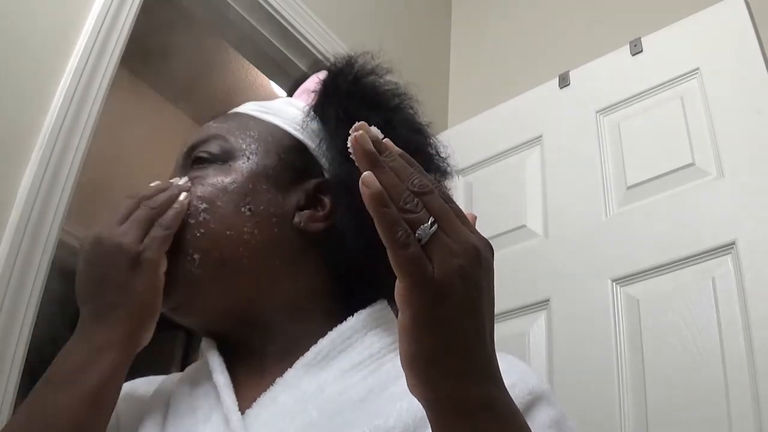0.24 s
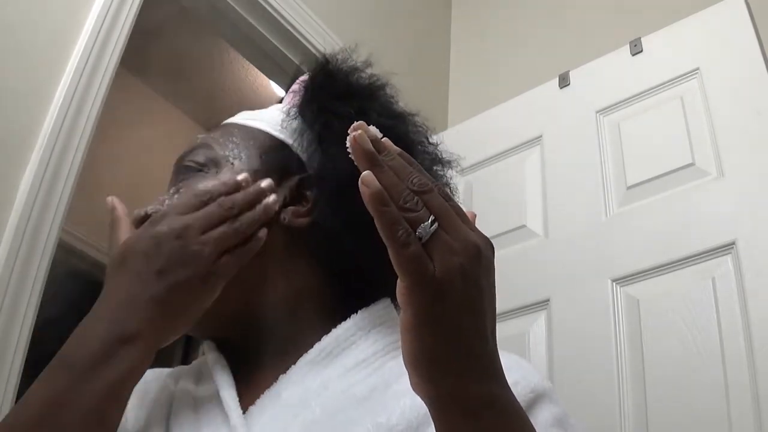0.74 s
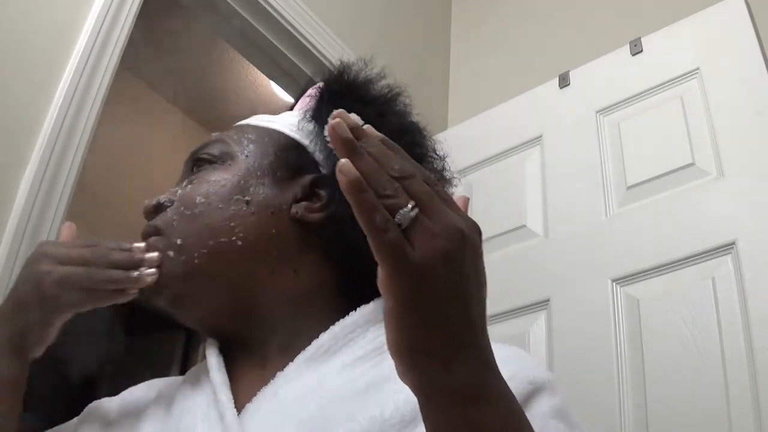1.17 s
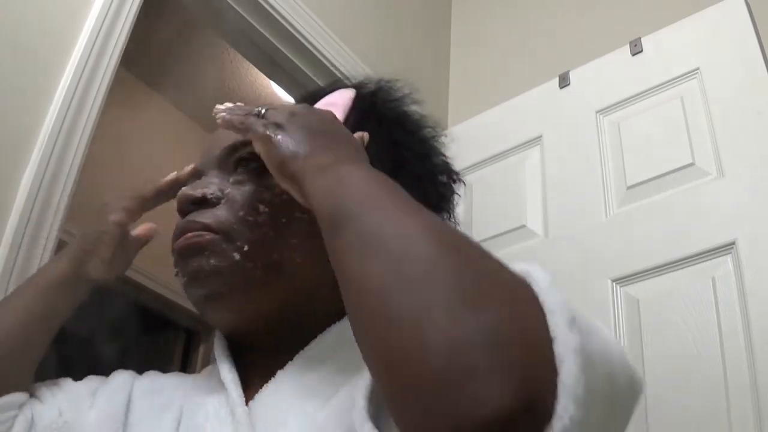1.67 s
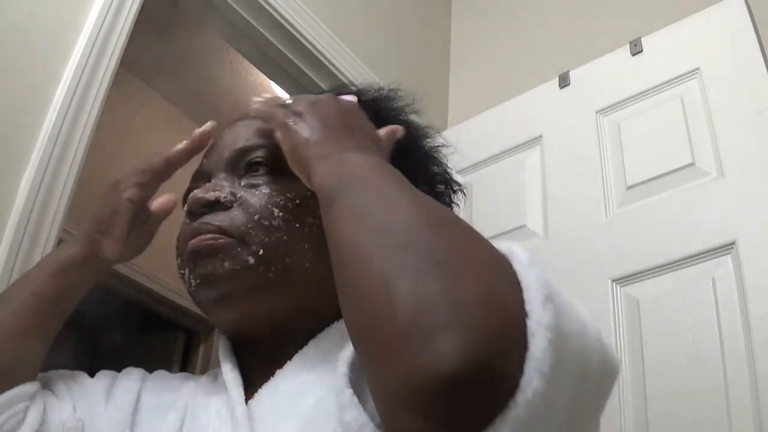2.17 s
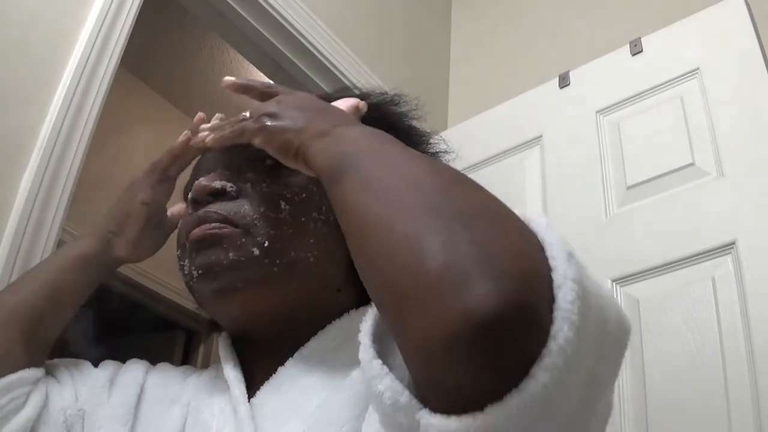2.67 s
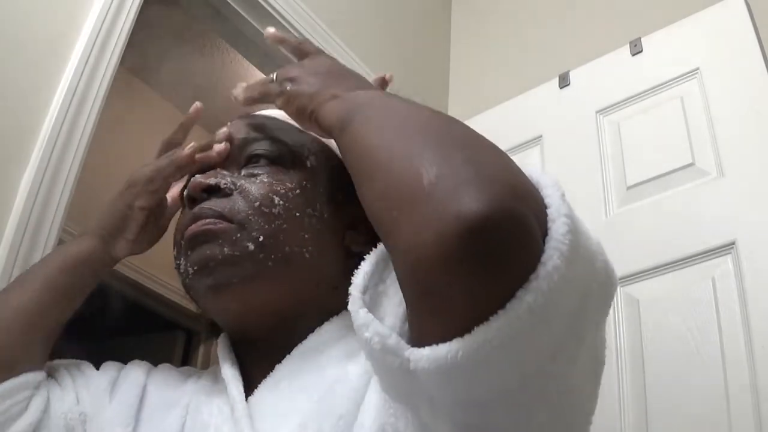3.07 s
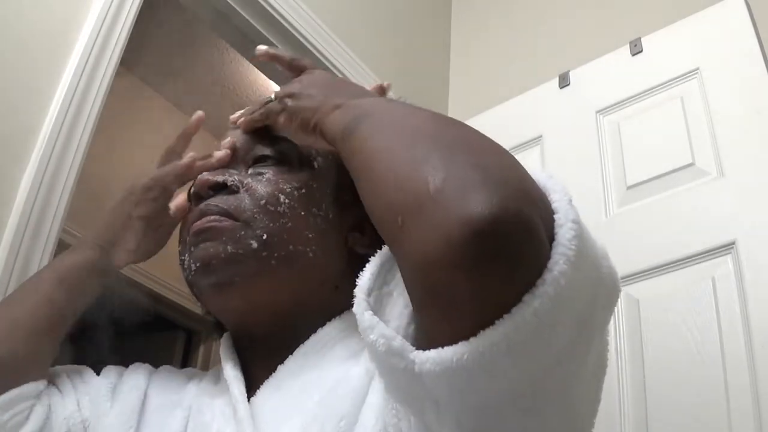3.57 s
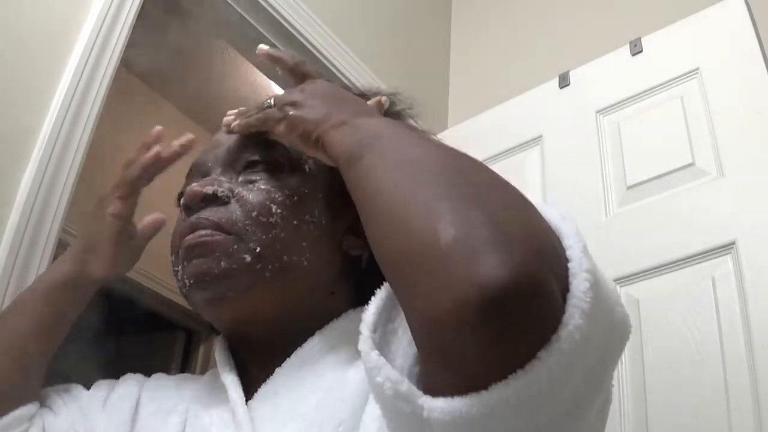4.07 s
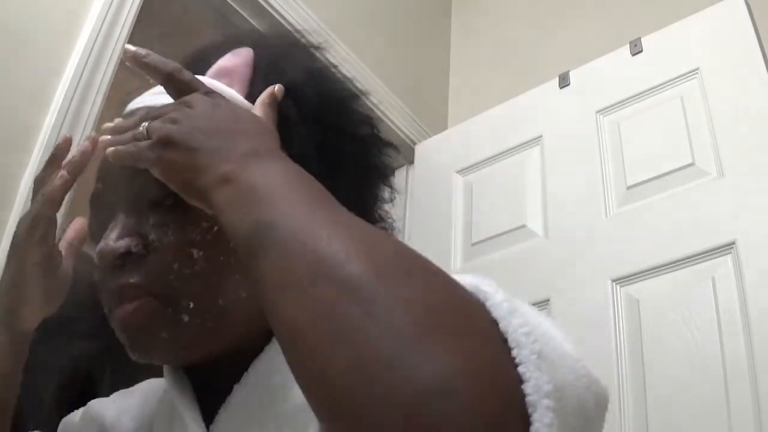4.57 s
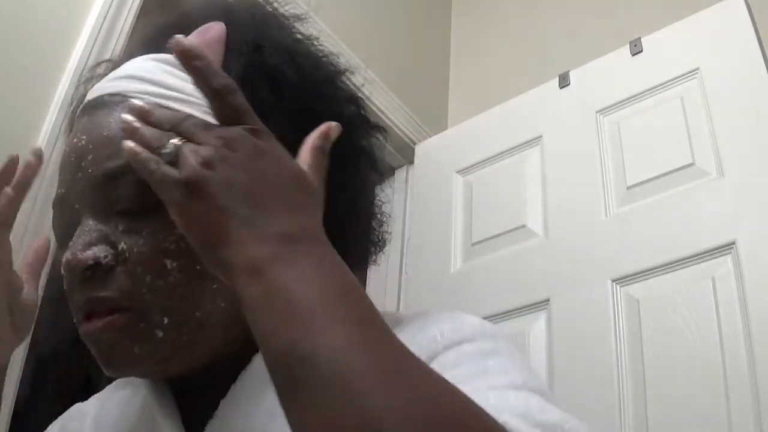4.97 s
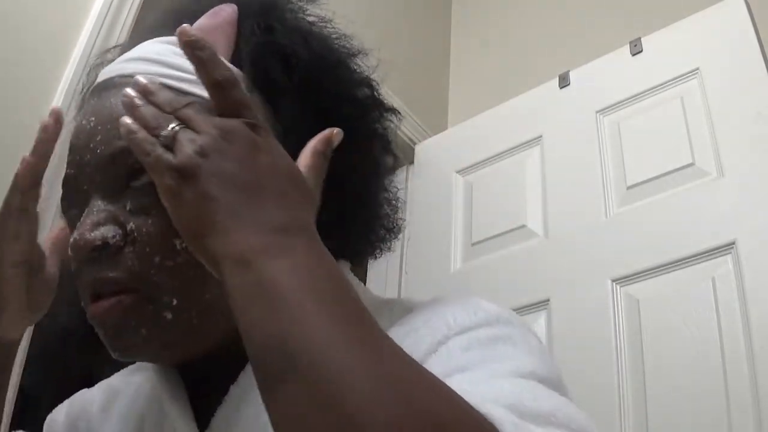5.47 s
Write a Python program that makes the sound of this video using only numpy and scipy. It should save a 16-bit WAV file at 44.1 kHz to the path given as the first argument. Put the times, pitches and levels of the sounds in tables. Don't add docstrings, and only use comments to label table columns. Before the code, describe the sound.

A facial steamer hisses loudly and continuously, very near a stereo microphone in a small hard-walled bathroom. Fine fizz and sharp droplet spits ride on the bright jet, with a quiet low simmer and an occasional soft tank knock beneath. The level dips suddenly at about 1.4 seconds and climbs back; later the hiss falters slightly and spits grow more frequent.

```python
import sys
import numpy as np
from scipy import signal
from scipy.fft import rfft, irfft
from scipy.io import wavfile
from scipy.ndimage import uniform_filter1d

SR = 44100
rng = np.random.default_rng(int(sys.argv[2]) if len(sys.argv) > 2 else 0)


def transcribe(signal):
    frames = np.atleast_2d(signal).T
    limited = np.clip(frames, -1, 1)
    pcm = np.round(limited * 32767).astype(np.int16)
    wavfile.write(sys.argv[1], SR, pcm)


def gain_from_decibels(decibels):
    exponent = np.asarray(decibels, float) / 20
    return 10 ** exponent


N = 252693

# (frequency [Hz], density [dB per Hz])
JET_SPECTRUM = [(260, -46), (450, -20.5), (492, -18), (538, -15), (918, -12.5), (1020, -10.5),
                (1220, -13.5), (1410, -6), (2450, -9), (3940, -7.5), (5550, -5.5), (8930, 1), (11300, -3.5),
                (15700, -16.5)]
# (frequency [Hz], width [Hz], lift [dB])
NOZZLE_MODES = [(700, 81, 2), (815, 42, 3), (1033, 80, 3), (1190, 120, -1.5), (1364, 49, 4), (1465, 23, 3),
                (1800, 60, 0.5), (1940, 30, 0.5), (2080, 93, 4.5), (2645, 87, 2), (3950, 125, 4),
                (4540, 37, 2), (6090, 48, 4.5), (8790, 400, 1.5)]
# (time [s], peak [dB], pitch [Hz])
SPITS = [(0.396, -3, 6201), (0.558, -4, 11541), (0.672, -7, 4995), (1.205, -7, 9100), (1.318, -8, 4478),
         (1.395, -6, 8000), (1.709, -3, 3900), (1.737, -7, 3700), (1.771, -7, 3550), (2.34, -3.5, 10163),
         (2.714, -6, 3840), (3.366, -6, 3730), (3.739, -8, 3789), (3.781, -5, 4850), (3.977, -3, 8785),
         (4.321, -2, 6546), (4.805, -2, 10300), (5.035, -4.5, 3789), (5.048, -12, 1390), (5.088, 0, 11714),
         (5.257, -7, 5857), (5.298, -1, 9900), (5.41, -6, 7924)]
# (time [s], length [s], hiss change [dB])
FALTERS = [
    (2.85, 0.2, 0),
    (2.99, .08, 1.2),
    (4.2, .25, -1.5),
    (4.5, .2, -1),
    (4.71, 0.13, -1.5),
    (5.21, .07, -2),
    (5.3, .06, 0.5),
    (5.42, 0.21, -1.2),
]
# (frequency [Hz], density [dB per Hz])
SIMMER_SPECTRUM = [(40, -32), (60, -18), (75, -7), (100, -10.5), (125, -1.5), (240, 0), (400, -3.5),
                   (600, -24), (900, -37)]
# (frequency [Hz], width [Hz], lift [dB])
TANK_MODES = [(121, 30, 4), (198, 4.1, 0), (266, 25, -8.5), (299.6, 10, 6.5), (364, 20, 6.5),
              (388.7, 18.6, -14.5), (411, 11, 2), (494.7, 13, 13)]
# (time [s], peak [dB], pitch [Hz])
KNOCKS = [
    (.074, -16, 225),
    (1.19, -23, 400),
    (1.443, -20, 344),
    (1.975, -22, 732),
    (4.0715, -12, 290),
    (4.082, -21, 480),
]
# (time [s], length [s], change [dB])
LULLS = [
    (.55, 0.4, -1.5),
    (1.1, 0.13, -1),
    (1.3, 0.26, 0),
    (1.56, 0.071, -6.5),
    (2.55, 0.45, -2),
    (3.05, 0.23, 1.5),
    (3.6, .3, -1.5),
    (4.4, 0.53, -2),
    (5.42, 0.17, -5.5),
    (5.73, 0.31, -4),
]
# (time [s], length [s], level [dB], centre [Hz])
DRIP_BURSTS = [
    (3.80, 0.059, -26, 4200),
    (3.90, 0.053, -25, 4200),
    (5.006, 0.11, -25, 4200),
]
# (frequency [Hz], density [dB per Hz])
RUMBLE_SPECTRUM = [(15, -6), (30, -2), (50, -2), (70, -4), (100, -40)]
# (frequency [Hz], likeness [0..1])
LIKENESS = [(300, 0.97), (700, 1), (900, 0.9), (1100, 0.62), (1800, 0.73), (2700, 0.81), (4000, 0.67),
            (5300, 0.3), (6500, 0.33), (8000, 0.53), (10000, 0.85), (12000, 0.86), (13000, 1)]
# (frequency [Hz], level [dB])
LEFT_LOUDER = [(60, 0), (200, .3), (700, 1.2), (1030, 4), (1200, 1.5), (1400, 4), (2200, 2.5), (3400, 2.3),
               (4000, 5), (6000, 3), (8000, .1), (10000, -.5), (13000, 0)]
# (frequency [Hz], phase [rad])
LEFT_LEADS = [(60, -0.02), (4500, 0.58), (5200, -0.74), (6000, -1.2), (6600, -0.42), (7500, -0.57),
              (10000, -0.12), (13000, 0)]
# (low [Hz], high [Hz], share of time kept [0..1])
SIDE_GAPS = [(1, 120, 0), (120, 300, .04), (300, 450, .1), (450, 650, .03), (650, 800, .4), (800, 950, .75),
             (1100, 1300, .7), (12300, 16000, 0)]


def steam(hiss_db, roar_db):
    pan = np.array([[1], [.5]])
    jet = rms_one(turbulence(roar_db - roar_db.mean(), gust_db=0.26, eddy_db=0.7, patch_db=0.44,
                             flutter_db=1.0, droplets_per_s=1500, droplets_db=-7))
    jet = jet + fizz(300, level_db=-7.0, t60_s=0.019) * pan
    jet = jet + crackle(200, level_db=7) * pan
    coloured = rms_one(colour(bathroom(jet), JET_SPECTRUM, NOZZLE_MODES))
    return gain_from_decibels(hiss_db + 2.0) * coloured + ring(SPITS, t60_s=.012) * pan


def turbulence(roar_db, gust_db, eddy_db, patch_db, flutter_db, droplets_per_s, droplets_db):
    born = rng.random((2, N)) < droplets_per_s / SR
    sizes = gain_from_decibels(4.1 * np.minimum(rng.exponential(1, (2, N)), 4)) * rng.choice([-1, 1], (2, N))
    droplets = gain_from_decibels(droplets_db) * rms_one(born * sizes)
    white = rng.standard_normal((2, 2, N))
    shared_db = gust_db * drift(10.0) + eddy_db * drift(163.0)
    edges_hz = 300 * 2 ** np.arange(0, 6.1, 1 / 3)
    out = 0
    for k, (low_hz, high_hz) in enumerate(zip(edges_hz, edges_hz[1:])):
        source = white[k % 2] + np.roll(droplets, k * 9001, axis=1)
        sos = signal.butter(2, [low_hz, high_hz], "band", fs=SR, output="sos")
        band = signal.sosfilt(sos, source)
        roar_share = np.clip(np.log2(9000 / high_hz), 0, 1)
        own_db = patch_db * drift(5.9) + flutter_db * drift(41.0)
        out = out + band * gain_from_decibels(shared_db + own_db + roar_share * roar_db)
    return out


def fizz(per_s, level_db, t60_s):
    when, size, pitch = rng.random((round(per_s * N / SR), 3)).T
    return ring(zip(when * (N - 1) / SR, level_db + 6 * size, 600 + 14500 * pitch), t60_s)


def crackle(per_s, level_db):
    born = rng.random(N) < per_s / SR
    size_db = level_db + 3.1 * np.minimum(rng.exponential(1, N), 2)
    return gain_from_decibels(size_db) * rng.choice([-1, 1], N) * born


def bathroom(x):
    t60_s, wet_db, wall_cut_hz = 0.32, -7, 4300
    hz = np.fft.rfftfreq(N, 1 / SR)
    dull = 1 / np.sqrt(1 + (hz / wall_cut_hz) ** 2)
    out = []
    for one in x:
        wet = 0
        for k, lag_s in enumerate(rng.uniform(.008, .03, 8)):
            loop = dull * gain_from_decibels(-60 * lag_s / t60_s) * np.exp(-2j * np.pi * hz * lag_s)
            wet = wet + (-1) ** k * loop / (1 - loop)
        out.append(irfft(rfft(one) * (1 + gain_from_decibels(wet_db) * wet / 3), N))
    return np.array(out)


def tank(simmer_db):
    lumps = gain_from_decibels(1.8 * drift(6.7))
    bubbling = rng.standard_normal((2, N)) * lumps
    simmer = gain_from_decibels(simmer_db + 1.96) * rms_one(colour(bubbling, SIMMER_SPECTRUM, TANK_MODES))
    edge = [(s, level_db - 2, 2.4 * hz) for s, level_db, hz in KNOCKS]
    knocks = ring(KNOCKS, t60_s=.03) + ring(edge, t60_s=.018)
    return simmer + knocks * [[1], [0]]


def drip_bursts():
    t, out = np.arange(N) / SR, 0
    for s, length_s, level_db, hz in DRIP_BURSTS:
        sos = signal.butter(1, [hz * 0.67, hz * 1.25], "band", fs=SR, output="sos")
        noise = rms_one(signal.sosfilt(sos, rng.standard_normal((2, N))))
        out = out + gain_from_decibels(level_db) * np.exp(-(2 * (t - s) / length_s) ** 2) * noise
    return out


def rumble():
    noise = colour(rng.standard_normal(N), RUMBLE_SPECTRUM, [])
    return gain_from_decibels(-53.5) * rms_one(noise * gain_from_decibels(4.6 * drift(2.8))) * [[1], [0]]


def two_ports(common, apart):
    hz = np.fft.rfftfreq(N, 1 / SR) + 1
    alike = np.clip(at_hz(LIKENESS, hz), 0, 1)
    mid = np.sqrt((1 + alike) / 2) * rfft(common)
    side = np.sqrt((1 - alike) / 2) * rfft(apart)
    tilt = gain_from_decibels(at_hz(LEFT_LOUDER, hz) / 2) * np.exp(.5j * at_hz(LEFT_LEADS, hz))
    return irfft(np.array([(mid + side) * tilt, (mid - side) / tilt]), N)


def gain_control(x):
    duck_s, duck_db, attack_s, recover_db_per_s = 1.385, -3.5, 0.01, 2
    since_s = np.arange(N) / SR - duck_s
    gain_db = np.minimum(duck_db + recover_db_per_s * since_s, 0)
    return x * gain_from_decibels(np.clip(since_s / attack_s, 0, 1) * gain_db)


def thin_side(side):
    hz, spectrum, out = np.fft.rfftfreq(N, 1 / SR), rfft(side), side.copy()
    hold = 1500
    for low_hz, high_hz, kept in SIDE_GAPS:
        lost = np.repeat(rng.random(N // hold + 1) > kept, hold)[:N]
        band = irfft(spectrum * (hz >= low_hz) * (hz < high_hz), N)
        out -= uniform_filter1d(lost * 1., size=700) * band
    return out


def ring(events, t60_s):
    out, t = np.zeros(N), np.arange(round(t60_s * SR)) / SR
    shape = (1 - np.exp(-t / .0005)) * np.exp(-np.log(1000) * t / t60_s)
    for s, level_db, hz in events:
        at = round(s * SR)
        tone = gain_from_decibels(level_db) * np.sin(2 * np.pi * hz * t) * shape
        out[at:at + len(t)] += tone[:N - at]
    return out


def colour(x, spectrum, modes):
    hz = np.fft.rfftfreq(N, 1 / SR) + 1
    level_db = at_hz(spectrum, hz)
    for mode_hz, width_hz, lift_db in modes:
        level_db = level_db + lift_db / (1 + (2 * (hz - mode_hz) / width_hz) ** 2)
    return irfft(rfft(x) * gain_from_decibels(level_db), N)


def drift(rate_hz):
    r = np.exp(-40 * np.pi * rate_hz / SR)
    noise = rng.standard_normal(N // 20 + 3002)
    slow = signal.lfilter([1], [1, -2 * r, r * r], noise)[3000:]
    return np.interp(np.arange(N) / 20, np.arange(len(slow)), rms_one(slow - slow.mean()))


def bells(rows):
    t = np.arange(N) / SR
    return sum(change_db * np.exp(-(2 * (t - s) / length_s) ** 2) for s, length_s, change_db in rows)


def at_hz(points, hz):
    table_hz, value = np.array(points).T
    return np.interp(np.log(hz), np.log(table_hz), value)


def rms_one(x):
    return x / np.sqrt(np.mean(x ** 2) + 1e-20)


def scene():
    hiss_db, soft_start_db, soft_start_s, simmer_db = -15.5, -1.5, 0.16, -34
    roar_follows = .3
    falter_db = bells(FALTERS)
    start_db = soft_start_db * np.exp(-np.arange(N) / SR / soft_start_s)
    jet = steam(hiss_db + start_db + falter_db, (roar_follows - 1) * falter_db)
    common, apart = jet + tank(simmer_db + bells(LULLS)) + drip_bursts() + rumble()
    return two_ports(common, apart)


def roll_off(x):
    return signal.sosfilt(signal.butter(12, 15850, fs=SR, output="sos"), x)


def record(dry):
    cutoff_hz = 15760
    ducked = gain_control(dry)
    limited = ducked / (1 + abs(ducked / .92) ** 8) ** (1 / 8)
    left, right = irfft(rfft(limited) * (np.fft.rfftfreq(N, 1 / SR) < cutoff_hz), N)
    mid, side = (left + right) / 2, thin_side((left - right) / 2)
    return roll_off(np.array([mid + side, mid - side]))


dry = scene()
out = record(dry)
transcribe(out)
```